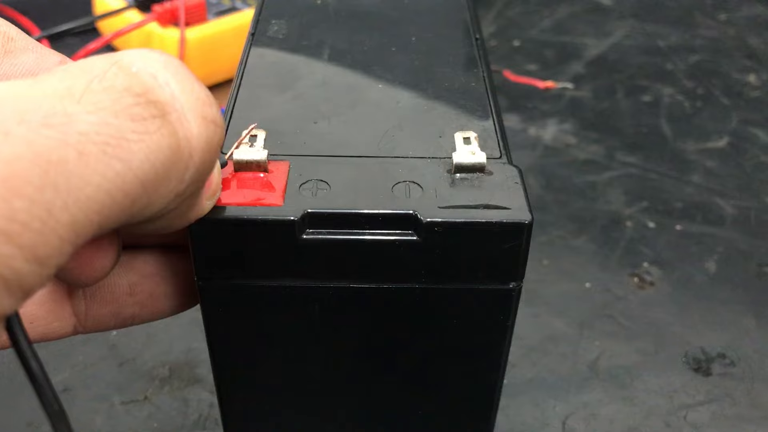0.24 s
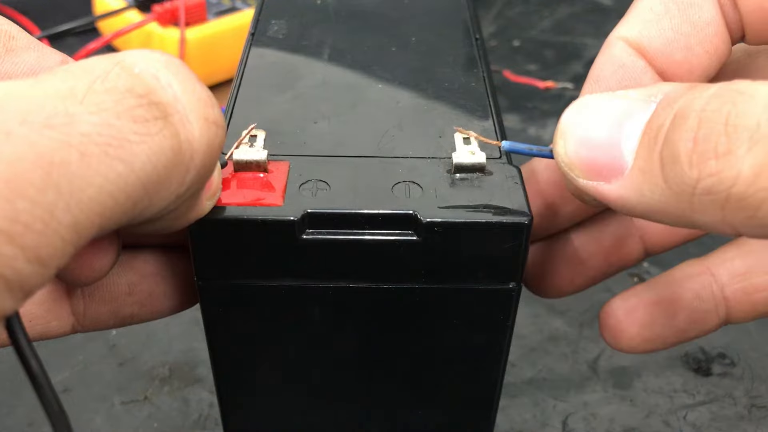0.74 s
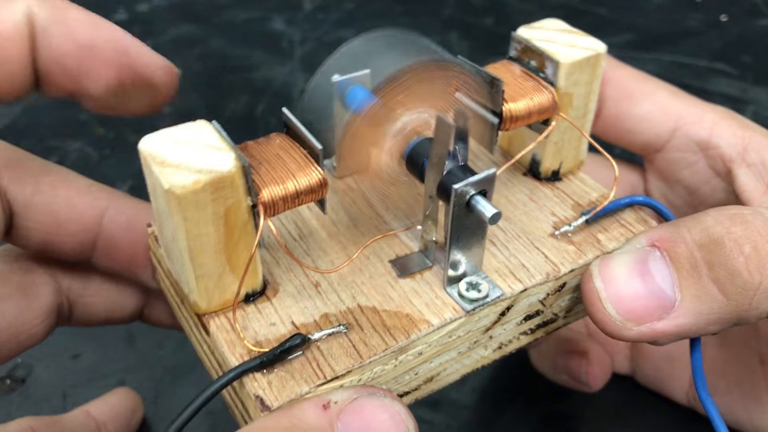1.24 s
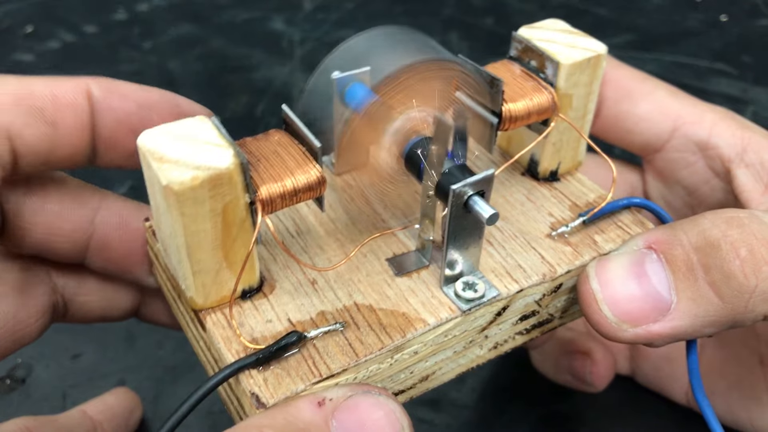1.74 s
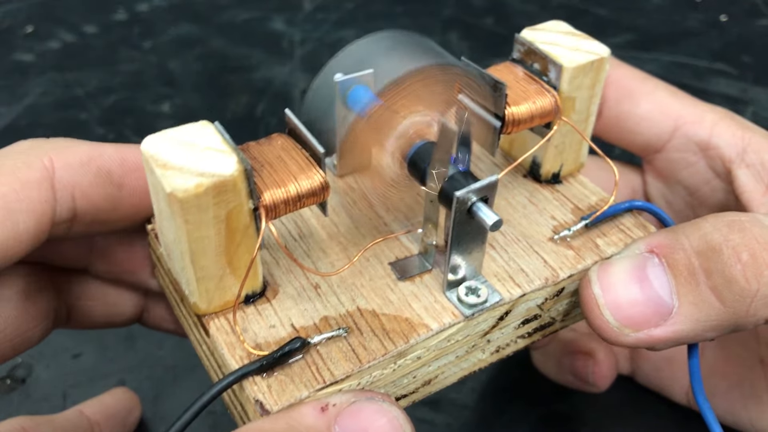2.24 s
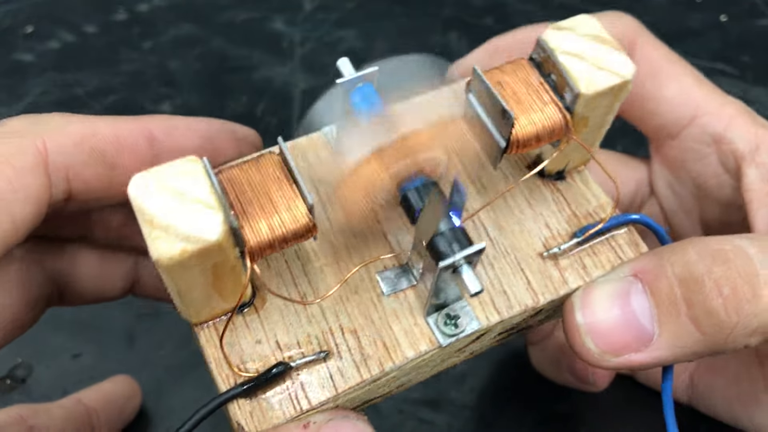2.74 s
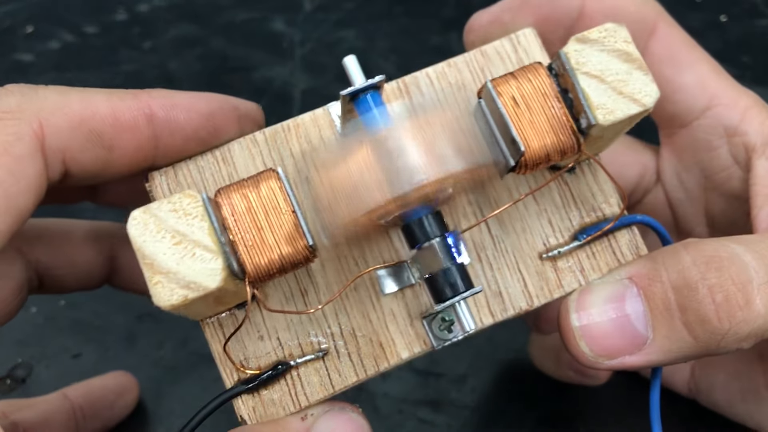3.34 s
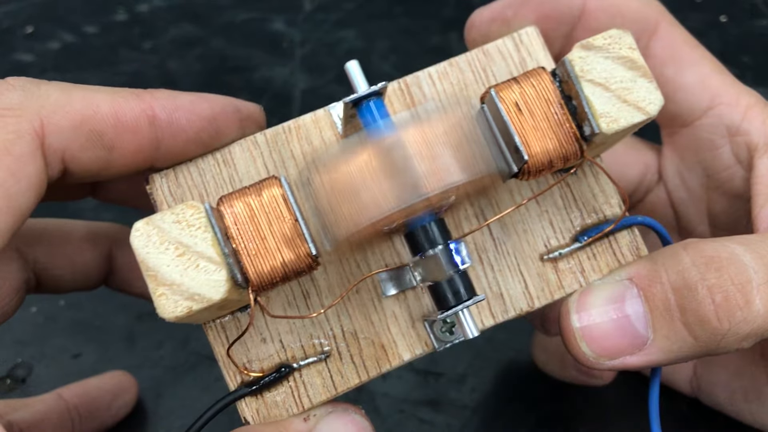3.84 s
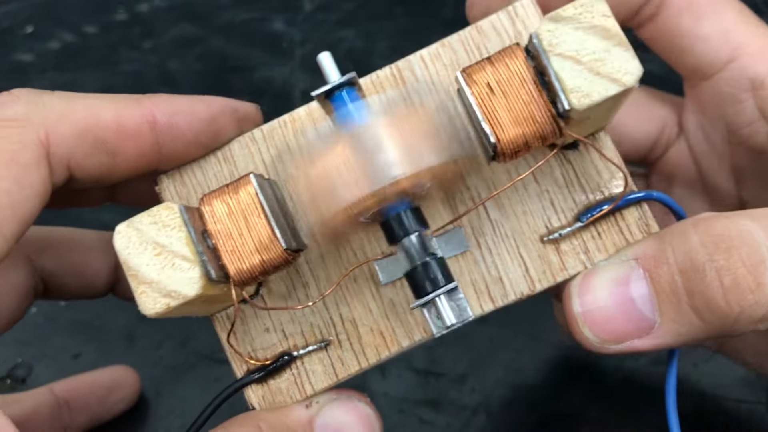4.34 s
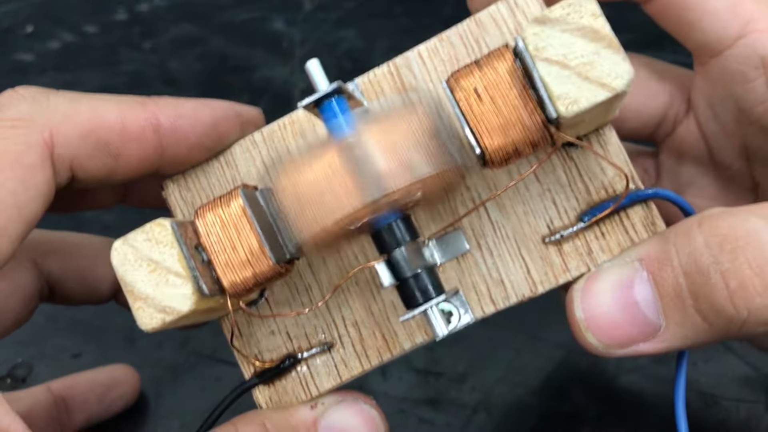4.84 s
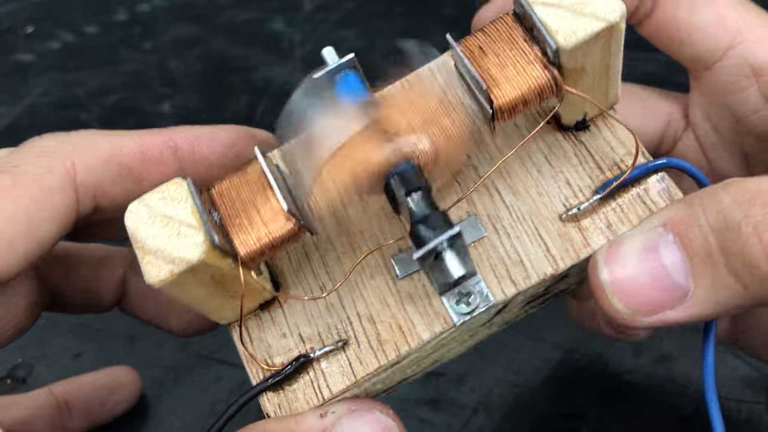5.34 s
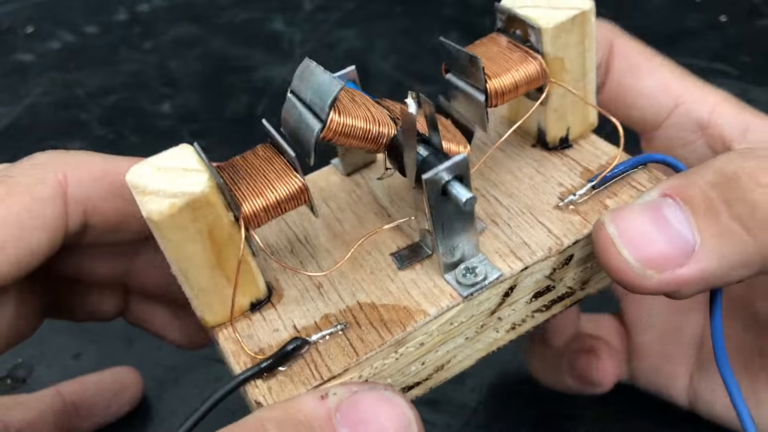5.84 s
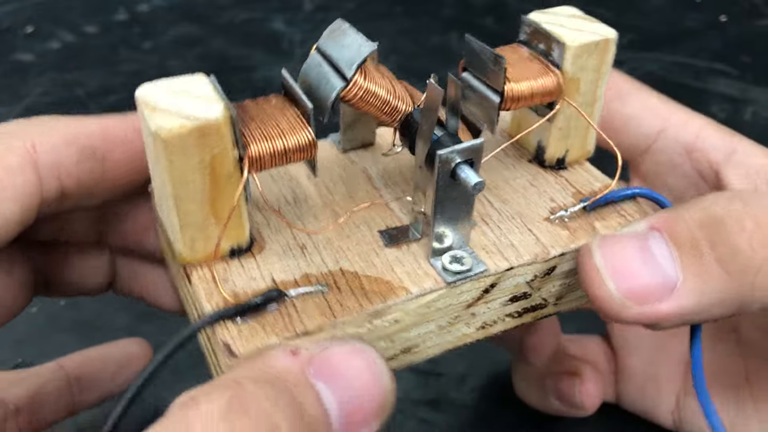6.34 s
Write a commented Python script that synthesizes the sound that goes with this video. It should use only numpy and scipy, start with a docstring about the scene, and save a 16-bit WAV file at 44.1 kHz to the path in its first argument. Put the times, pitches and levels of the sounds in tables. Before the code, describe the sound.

A spark snaps and a small homemade motor whirs up at once, buzzing bright and raspy, then slows into separate clicks and stops.

```python
"""Room noise is heard first, with low hums that come and go throughout. A spark cracks as a wire meets its terminal,
and a small motor on a hand-held wooden board runs up: two strip brushes scrape a split commutator and knock on
landing after each gap, exciting modes of strips, brackets and board, coloured by how the board is turned.
Power goes off; the rotor coasts against drag and friction, a brush drags once more, and the rotor sticks and
settles with a faint rub. Room noise and hums remain."""
import sys
import numpy as np
from scipy import signal
from scipy.fft import rfft, irfft
from scipy.io import wavfile

SR = 44100
rng = np.random.default_rng(int(sys.argv[2]) if len(sys.argv) > 2 else 0)


def materialize(psi):
    """Save the field psi as 16-bit PCM at rate SR to the path in sys.argv[1].

    A 1-D psi becomes a single channel; in a 2-D psi each row is a channel.
    """
    bounded = np.clip(np.atleast_2d(psi).T, -1, 1)
    quanta = np.round(bounded * 32767).astype(np.int16)
    wavfile.write(sys.argv[1], SR, quanta)


def how_loud(loudness_db):
    """Turn decibels into a plain amplitude multiplier (0 dB gives 1, 20 dB gives 10)."""
    steps = np.asarray(loudness_db, float) / 20
    return 10 ** steps


N = 290696   # samples

# rotor under power: (time [s], speed [turns/s])
POWERED_SPEED = [(1.16, 5.853), (1.2, 8.881), (1.27, 35.297), (1.44, 57.363), (1.6, 58.837), (1.9, 57.611),
                 (2.5, 58.216), (3.0, 57.381), (4.38, 57.78)]
# how the board is held: (time [s], attitude [0 edge-on, 1 face-up, 2 tipped back])
HOLD = [(2.45, 0), (2.7, 0.15), (3.0, .67), (3.3, 0.9), (4.4, .9), (4.55, 2), (4.75, 1.6), (5.1, 1.85),
        (5.5, 1.3)]
# modes of brush strips and shaft brackets:
# (frequency [Hz], width of each of two passes [Hz], edge-on [dB], face-up [dB], tipped back [dB])
METAL_MODES = [(4267, 730, -10, -4.5, -5.5), (4940, 430, -8.5, -9, -13), (5257, 140, -10, -6, -4),
               (6160, 900, -17, -15, -16), (6986, 640, -3.5, -5.5, -4.5), (8040, 900, -19, -14.5, -23),
               (8710, 870, -10.5, -10, -3.5), (9755, 780, -2.5, -4, -2.5), (10350, 370, -2, -6.5, -9),
               (10890, 360, -4, -1, 4), (11690, 400, -9.5, 5, 2.5), (12280, 550, -2.5, 2.5, 7),
               (12850, 800, -7, -0.5, -1.5), (13500, 600, -8.5, -1.5, -13), (14200, 800, -5.5, -2.5, -4),
               (15160, 820, -6, -6.5, -4.5), (15650, 700, -5, -7.5, -7)]
# modes of board and posts:
# (frequency [Hz], width of each of two passes [Hz], edge-on [dB], face-up [dB], tipped back [dB])
WOOD_MODES = [(653, 258, -14.5, -17, -18.5), (840, 200, -10, -15.5, -13.5), (997, 395, -9, -12.5, -12),
              (1200, 330, -12, -15, -19), (1530, 495, -11, -8, -10), (1888, 164, 0.5, -1.5, 1.5),
              (2162, 355, -9.5, -11, -10), (2338, 244, -10, -9, -6), (3011, 211, -4, -3, -4),
              (3370, 370, -6, -11, -8.5), (3740, 1060, -12, -17, -13)]
# slow brushes, half a turn from knock through lift-off, gap and landing: (angle [turns], scrape [dB], rattle [dB])
SLOW_PASS = [(0, -1.5, 2), (.03, 0, 3), (.06, 3.5, 1.8), (.1, 3, 0.5), (.14, -1.5, -2), (.21, -1, 0),
             (.24, -11, -4.5), (.3, -13, -5), (.325, 1, 0), (.355, 3.5, 3), (.39, 1, 2.5)]
# smooth swings round the rotor, slow and fast: (cycles [per turn], depth [dB], angle of the peak [turns])
SLOW_SCRAPE_SWING = [(0.89, 1.3, 0.6)]
SLOW_RATTLE_SWING = [(1, 1.7, .45)]
FAST_SCRAPE_SWING = [(1, 0.32, .2), (2, 1.74, 0.44)]
FAST_RATTLE_SWING = [(1, 2.7, .2), (2, 3.5, .02), (4, 1.8, 0.94)]
# magnetic pull shaking the board twice a turn: (time [s], level [dB])
MAGNETIC_PULL = [(1.3, -68), (1.6, -60), (2.3, -59), (2.75, -47), (2.95, -53.5), (3.15, -45.5), (3.45, -46),
                 (3.65, -56), (3.85, -41), (4.1, -56), (4.4, -45.5), (4.65, -52), (4.9, -85)]
# last drag of a brush before the rotor sticks: (time [s], level [dB])
LAST_DRAG = [(5.6, -78), (5.625, -56), (5.645, -42), (5.651, -51), (5.656, -85)]
# wire meets terminal: (time [s], peak of the direct crack [dB])
SPARK = [(1.1611, -12)]
# low hums that swell and fade: (time [s], length before the fall [s], from [Hz], to [Hz], level before waver [dB])
HUMS = [(1.074, 0.39, 76.2, 73.5, -43), (1.55, 0.51, 78.5, 77.8, -47.5), (3.03, 0.33, 73.5, 80.5, -41.5),
        (3.4, 0.24, 84, 92.3, -45.5), (3.95, 0.34, 86.6, 84, -47), (3.949, .55, 60, 54, -52),
        (4.675, 0.24, 117, 117, -44.5), (5.254, .38, 71, 79.7, -41.5), (5.45, 0.37, 63.8, 61.8, -44.5),
        (5.63, 0.46, 86.2, 87.4, -37.5), (6.4, .25, 85, 88.5, -44)]
# shape of the room noise spectrum: (frequency [Hz], relative density [dB])
ROOM_SPECTRUM = [(14, -50.5), (28, -26), (40, -6), (60, 4.5), (95, -2), (125, -1), (170, -11), (241, -4.5),
                 (377, -9), (459, -16), (574, -16), (700, -19.5), (1300, -19), (2080, -30), (2500, -29),
                 (5530, -33.5), (9000, -42), (12500, -48.5), (16000, -49)]
# room noise: (time [s], level [dB])
ROOM_LEVEL = [(0, -41.5), (.5, -42.5), (1.1, -42), (1.6, -46), (3, -44.5), (4.5, -43), (5.5, -43.5),
              (6.1, -42.5), (6.59, -42.5)]
# dips of the microphone: (frequency [Hz], width [Hz], depth [dB])
MIC_DIPS = [(5000, 500, -3), (10550, 500, -6)]

START_S, POWER_OFF_S, STICK_S = 1.16, 4.377, 5.655
START_TURN, FULL_SPEED = .88, 58   # turns; turns/s
# drag time constant; speed below zero toward which dry friction pulls (turns/s);
# further loss at the moment of sticking (turns/s) and its time constant
COAST_S, FRICTION, GRIP, GRIP_S = 1.061, 14.124, 4.56, .137
# level at full speed, and its rise per tenfold speed
SCRAPE_DB, SCRAPE_DB_PER_DECADE = -22.5, 14.5
RATTLE_DB, RATTLE_DB_PER_DECADE, RATTLE_EDGE_ON_DB = -27, 28, -2.5
SURGE_DB, SURGE_END_S = 2, 1.428   # harder brushing while the rotor gathers speed
# at a creep (below so many turns/s) the wood still judders and the hiss thins
CREEP_RATTLE_DB, CREEP_SCRAPE_LOSS_DB, CREEP_SPEED = -55.5, -1.5, 12.5
SETTLE_S, SETTLE_DB = .032, -55   # the stuck rotor settles with a faint rub
LAND_TURN, LATE_TURN = .315, .1   # where a slow brush lands, and how much later at full speed
# impulse gains, and their change at full speed
LANDING_DB, LANDING_FAST_DB = 23, -2.5
KNOCK_DB, KNOCK_FAST_DB, KNOCK_TURN = 25.5, -4, .03
THUD_SHARE, THUD_HZ = 1.13, 1300
THRICE_DB, THRICE_EDGE_ON_DB, THRICE_DB_PER_DECADE = -57, -12, 150   # shake three times a turn
DRAG_HZ, DRAG_WIDTH_HZ = 4650, 400   # width of each of two passes
HUM_RISE_S, HUM_FALL_S, HUM_WAVER_DB, HUM_WAVER_PER_S = .05, .08, 2.5, 9


def motor():
    """Modal excitation: scrape rings the metal, rattle the wood, impacts both, locked to the rotor's angle."""
    speed = rotor_speed()
    turns = START_TURN + np.cumsum(speed) / SR
    hold, = in_time(HOLD)
    edge_on = np.clip(1 - hold, 0, 1)
    decades = np.log10(speed / FULL_SPEED + 1e-9)
    fast = np.clip(speed / FULL_SPEED, 0, 1) ** 1.5
    seated = turns - LATE_TURN * fast   # fast brushes skim the gaps and land late
    shared_db = bite(turns, passes=3.0, spread_db=1.0)
    scrape_db, rattle_db = contact_pattern(turns, seated, fast)
    scrape_gain = how_loud(scrape_db + shared_db + bite(turns, passes=11.0, spread_db=1.26))
    rattle_gain = how_loud(rattle_db + shared_db)
    landing = brush_landings(turns, seated, fast, shared_db)
    # alike thuds draw faint lines in the bass
    thud = THUD_SHARE * signal.lfilter(*signal.butter(2, THUD_HZ, fs=SR), landing)
    # above the bass no two landings are alike
    ticks = landing * how_loud(rng.normal(0, 1.0, size=(2, N))) * rng.choice([-1, 1], size=(2, N))
    knocks = shaft_knocks(turns, fast)
    metal_drives, wood_drives = [], []
    for spot in range(2):
        scrape = rms_one(grit(9000, 2.34) * scrape_gain)
        metal_drives.append(scrape + .3 * ticks[spot] + .35 * knocks[spot])
    for spot in range(2):
        rattle = rms_one(grit(250 + 55 * speed, 3.04) * rattle_gain)
        wood_drives.append(rattle + thud + knocks[spot] + .86 * ticks[spot])
    metal = ring(metal_drives, METAL_MODES, hold)
    wood = ring(wood_drives, WOOD_MODES, hold)
    scrape_level, rattle_level = contact_levels(speed, decades, edge_on)
    return scrape_level * metal + rattle_level * wood + board_shake(turns, edge_on, decades) + last_drag()


def rotor_speed():
    """Rotational dynamics in turns per second: driven, then slowed by drag and dry friction, then stuck."""
    t = np.arange(N) / SR
    coasting = np.exp(-np.maximum(t - POWER_OFF_S, 0) / COAST_S)
    # friction grips harder just before sticking
    gripping = GRIP * np.exp(np.minimum(t - STICK_S, 0) / GRIP_S)
    speed = (in_time(POWERED_SPEED)[0] + FRICTION) * coasting - FRICTION - gripping
    return speed * (t >= START_S) * (t < STICK_S)


def contact_levels(speed, decades, edge_on):
    """Sliding-contact noise: scrape and rattle levels grow as powers of speed."""
    t = np.arange(N) / SR
    surge_db = SURGE_DB * np.clip((SURGE_END_S - t) / .1, 0, 1)
    creeping = np.clip(2 - 2 * speed / CREEP_SPEED, 0, 1) * (t > POWER_OFF_S) * (speed > 0)
    settling = how_loud(SETTLE_DB) * (t >= STICK_S) * (t < STICK_S + SETTLE_S)
    scrape_db = SCRAPE_DB + surge_db + CREEP_SCRAPE_LOSS_DB * creeping + SCRAPE_DB_PER_DECADE * decades
    rattle_db = RATTLE_DB + surge_db + RATTLE_EDGE_ON_DB * edge_on + RATTLE_DB_PER_DECADE * decades
    return how_loud(scrape_db) + settling, how_loud(CREEP_RATTLE_DB) * creeping + how_loud(rattle_db) + settling


def contact_pattern(turns, seated, fast):
    """Periodic modulation: brush contact varies with angle, in dB, blending from slow to fast patterns."""
    angle, *patterns = np.transpose(SLOW_PASS)
    scrape_slow, rattle_slow = (np.interp(seated % .5, angle, p, period=.5) for p in patterns)
    scrape_slow = scrape_slow + swing(turns, SLOW_SCRAPE_SWING)
    rattle_slow = rattle_slow + swing(turns, SLOW_RATTLE_SWING)
    scrape_db = scrape_slow * (1 - fast) + swing(turns, FAST_SCRAPE_SWING) * fast
    rattle_db = rattle_slow * (1 - fast) + swing(turns, FAST_RATTLE_SWING) * fast
    return scrape_db, rattle_db


def brush_landings(turns, seated, fast, shared_db):
    """Impulsive contact: a brush lands after each gap, twice a turn."""
    landing = half_turn_pulses(seated - LAND_TURN)
    # slow knocks stand out of the rubbing
    landing = landing * how_loud(LANDING_DB + LANDING_FAST_DB * fast)
    return landing * how_loud(shared_db + (4 - 3 * fast) * np.sin(2 * np.pi * turns))


def shaft_knocks(turns, fast):
    """Impact across a clearance: the loose shaft strikes its bracket twice a turn, varied at two spots."""
    scatter_db = rng.normal(0, 3, size=(2, N))
    gain = how_loud(KNOCK_DB + KNOCK_FAST_DB * fast - 3 * np.cos(2 * np.pi * turns) + scatter_db)
    return half_turn_pulses(turns - KNOCK_TURN) * gain * rng.choice([-1, 1], size=(2, N))


def board_shake(turns, edge_on, decades):
    """Forced vibration: sines at two and three cycles a turn, the former from magnetic pull."""
    thrice_db = THRICE_DB + THRICE_EDGE_ON_DB * edge_on + THRICE_DB_PER_DECADE * decades
    twice = how_loud(in_time(MAGNETIC_PULL)[0]) * np.sin(4 * np.pi * turns)
    return np.sqrt(2) * (twice + how_loud(thrice_db) * np.sin(6 * np.pi * turns))


def last_drag():
    """Friction-driven resonance: a brief burst of grit rings a narrow band."""
    once = resonance(grit(5000, 3.0), DRAG_HZ, DRAG_WIDTH_HZ)
    return how_loud(in_time(LAST_DRAG)[0]) * rms_one(resonance(once, DRAG_HZ, DRAG_WIDTH_HZ))


def ring(drives, modes, hold):
    """Modal superposition: steep resonances, neighbours rubbed at other spots, weighted by hold; rms near 1."""
    out, power = 0, 0
    for k, (hz, width, *levels_db) in enumerate(modes):
        gain = how_loud(np.interp(hold, range(3), levels_db))
        out = out + gain * resonance(resonance(drives[k % 2], hz, width), hz, width)
        power = power + gain ** 2 * np.pi * width / 2 / SR
    return out / np.sqrt(power)


def resonance(x, hz, width):
    """Damped oscillator: a two-pole band with gain 1 on top."""
    r = np.exp(-np.pi * width / SR)
    poles = [1, -2 * r * np.cos(2 * np.pi * hz / SR), r * r]
    return signal.lfilter([(1 - r * r) / 2, 0, (r * r - 1) / 2], poles, x)


def grit(per_s, spread_db):
    """Shot noise: random clicks of widely spread size, larger where they are fewer; rms 1."""
    sizes = how_loud(spread_db * np.minimum(rng.exponential(1, N), 5)) * rng.choice([-1, 1], N)
    return rms_one(sizes * (rng.random(N) < per_s / SR) / np.sqrt(per_s))


def bite(cycles, passes, spread_db):
    """Random modulation: dB values, so many per turn or per second, joined by straight lines."""
    strengths = rng.normal(0, 1, size=4000)
    return spread_db * np.interp(cycles * passes, np.arange(4000), strengths)


def swing(turns, parts):
    """Fourier synthesis: a sum of cosines round the rotor, in dB."""
    return sum(depth_db * np.cos(2 * np.pi * count * (turns - peak)) for count, depth_db, peak in parts)


def half_turn_pulses(turns):
    """Angular sampling: a unit pulse at every half turn completed."""
    return np.diff(np.floor(2 * turns), prepend=9).clip(0, 1)   # the 9 prevents a pulse at the first sample


def rms_one(x):
    """Power normalisation to rms 1."""
    return x / np.sqrt(np.mean(x ** 2) + 1e-20)


def in_time(rows):
    """Linear interpolation of a curve's columns at every sample."""
    s, *columns = np.transpose(rows)
    return [np.interp(np.arange(N) / SR, s, c) for c in columns]


def spark():
    """Electrical discharge: a high-passed noise crack decaying within about a millisecond."""
    (s, peak_db), = SPARK
    since = np.maximum(np.arange(N) / SR - s, 0)
    crack = rng.standard_normal(N) * (since > 0) * np.exp(-since / .0006)
    crack = signal.sosfilt(signal.butter(2, 800, "high", fs=SR, output="sos"), crack + 1e-18)
    return how_loud(peak_db) * crack / np.abs(crack).max()


def echoes(x, t60, wet_db, dull_hz):
    """Diffuse reverberation: a short, dull tail of dying noise from bench and walls."""
    t = np.arange(SR // 2) / SR
    tail = rng.standard_normal(len(t)) * how_loud(-60 * t / t60) * (t > .003)
    tail = tail / np.sqrt(np.sum(tail ** 2))
    tail = signal.lfilter(*signal.butter(1, dull_hz, fs=SR), tail)
    return how_loud(wet_db) * signal.fftconvolve(x, tail)[:N]


def hums():
    """Frequency and amplitude modulation: gliding sines that rise, waver together in level and fade."""
    out, t = 0, np.arange(N) / SR
    waver_db = bite(t, passes=HUM_WAVER_PER_S, spread_db=HUM_WAVER_DB)
    for s, length, from_hz, to_hz, level_db in HUMS:
        hz = np.interp(t, [s, s + length], [from_hz, to_hz])
        rise, fall = (t - s) / HUM_RISE_S, (s + length - t) / HUM_FALL_S + 1
        fade = np.clip(np.minimum(rise, fall), 0, 1)
        tone = np.sin(2 * np.pi * np.cumsum(hz) / SR)
        out = out + np.sqrt(2) * fade * how_loud(level_db + waver_db) * tone
    return out


def room():
    """Spectral shaping: Gaussian noise of fixed colour and slowly changing level."""
    hz, density_db = np.transpose(ROOM_SPECTRUM)
    log_hz = np.log(np.maximum(np.arange(N // 2 + 1) * SR / N, 1))
    spectrum = rfft(rng.standard_normal(N)) * how_loud(np.interp(log_hz, np.log(hz), density_db))
    return how_loud(in_time(ROOM_LEVEL)[0]) * rms_one(irfft(spectrum, N))


def scene():
    """Linear superposition: motor and spark with their echoes over hums and room."""
    near = motor() + spark()
    return (near + echoes(near, t60=0.11, wet_db=-11.0, dull_hz=5000) + hums() + room())[None]


def low_pass(x):
    """Removes everything above the highest recorded frequency."""
    return signal.sosfilt(signal.butter(12, 16810, fs=SR, output="sos"), x)


def record(dry):
    """Linear filtering: the microphone has two dips, and a steep low-pass cuts the top."""
    x = dry
    for hz, width, dip_db in MIC_DIPS:
        x = x - (1 - how_loud(dip_db)) * resonance(x, hz, width)
    # 15720 Hz edge, 0.5 dB ripple, 75 dB rejection
    x = signal.sosfilt(signal.ellip(14, .5, 75, 15720, fs=SR, output="sos"), x)
    return low_pass(x)


dry = scene()
out = record(dry)
materialize(out)
```